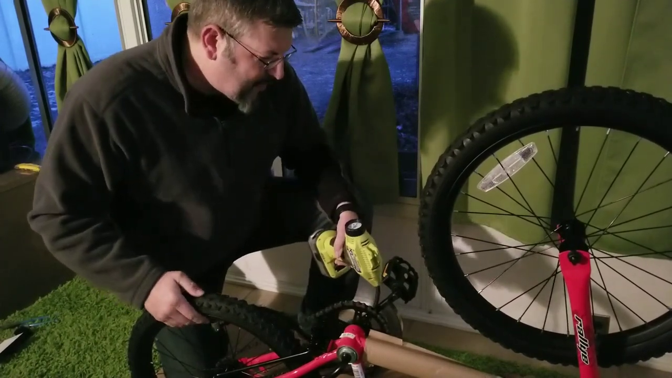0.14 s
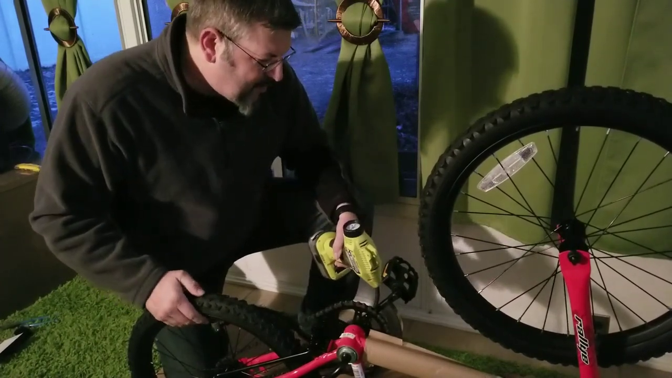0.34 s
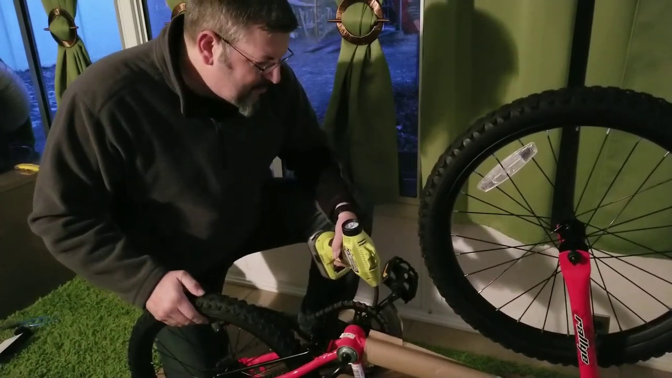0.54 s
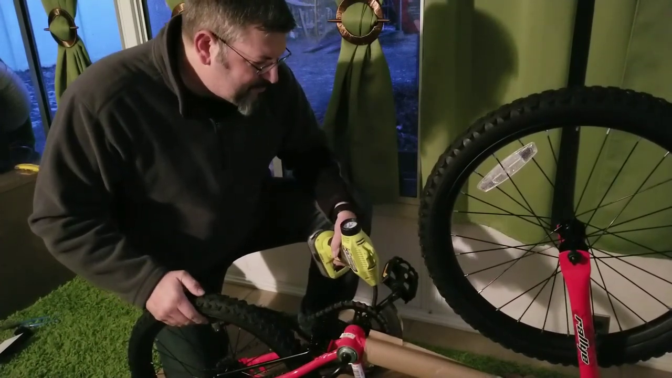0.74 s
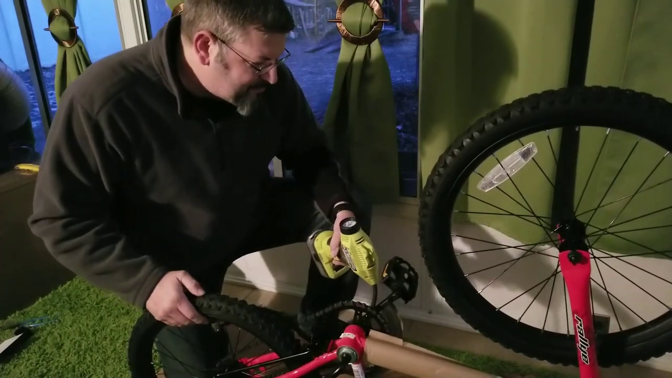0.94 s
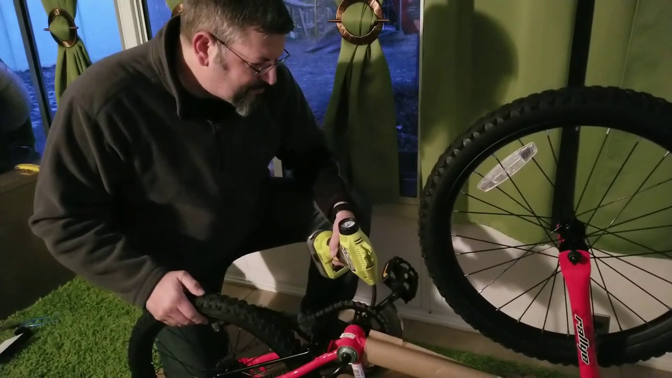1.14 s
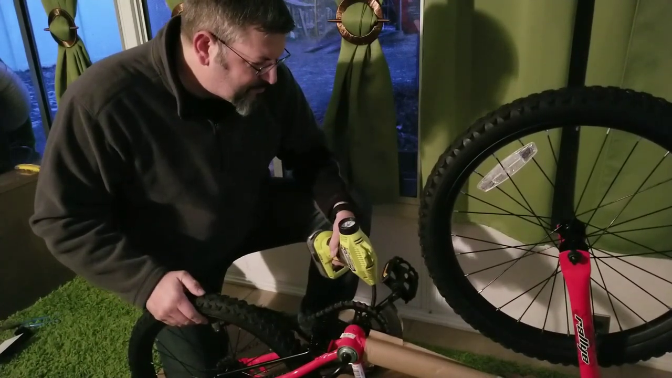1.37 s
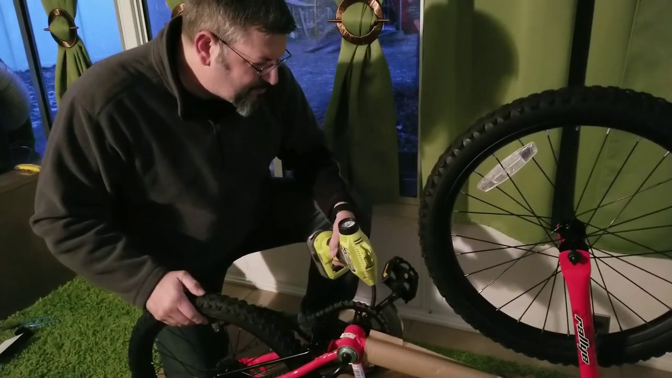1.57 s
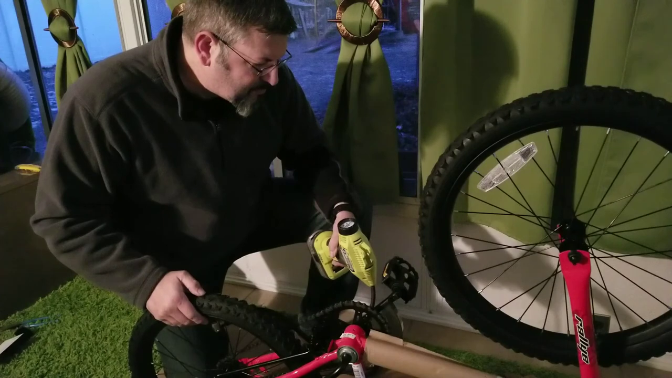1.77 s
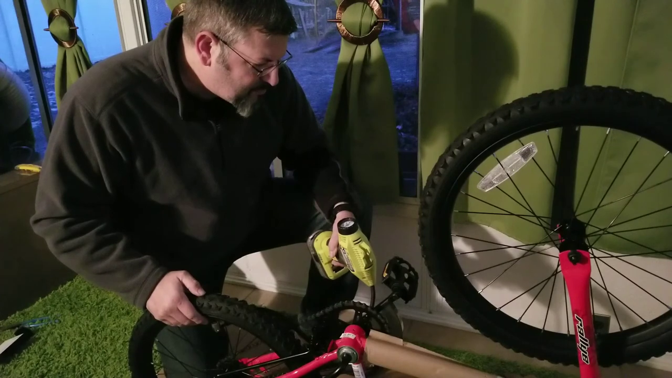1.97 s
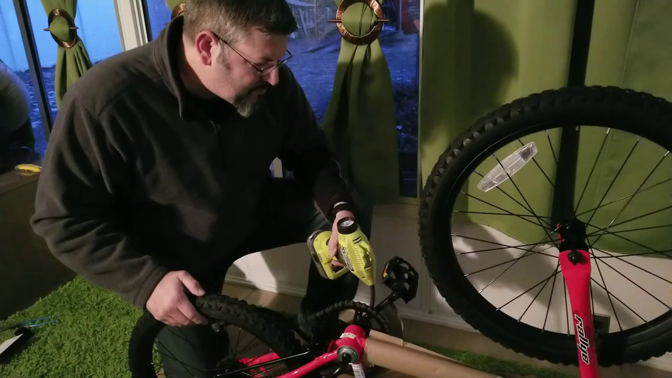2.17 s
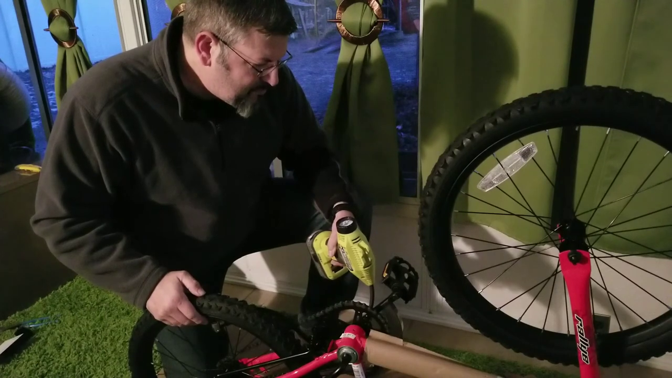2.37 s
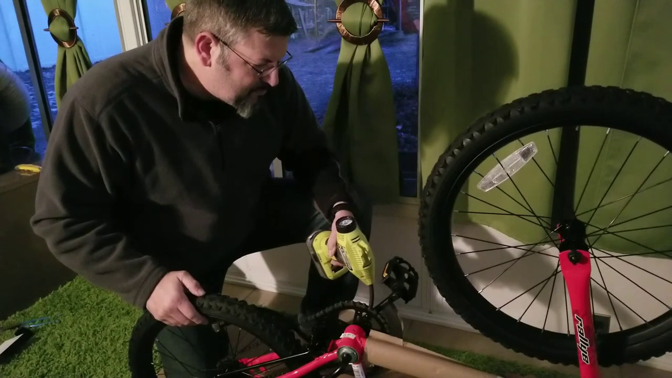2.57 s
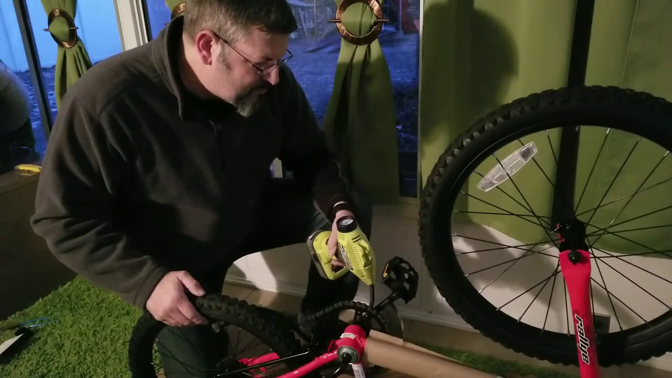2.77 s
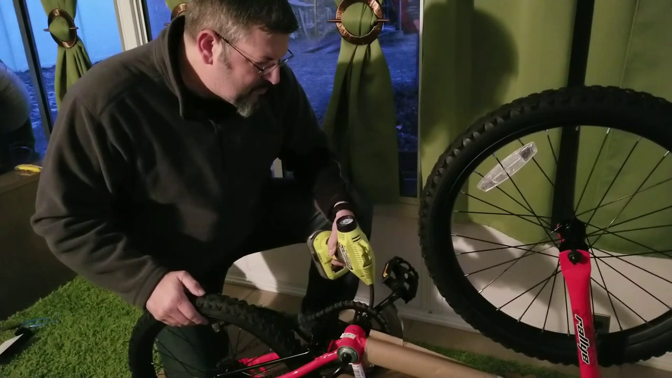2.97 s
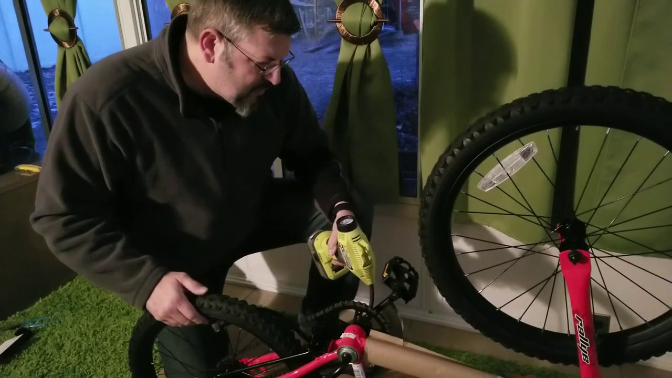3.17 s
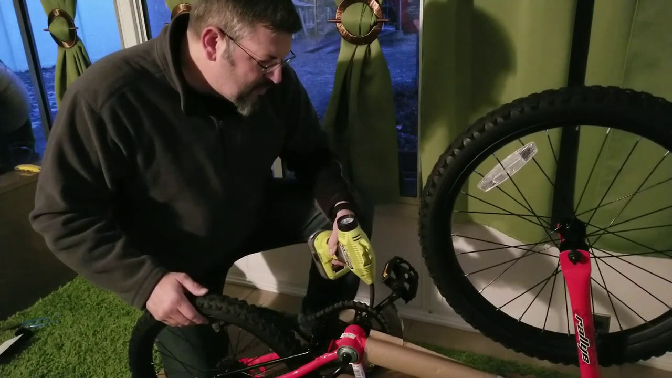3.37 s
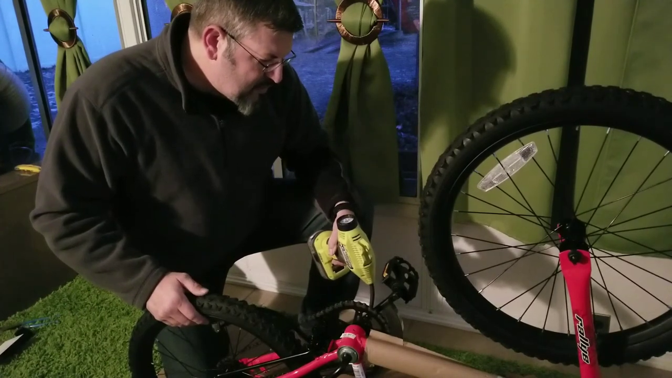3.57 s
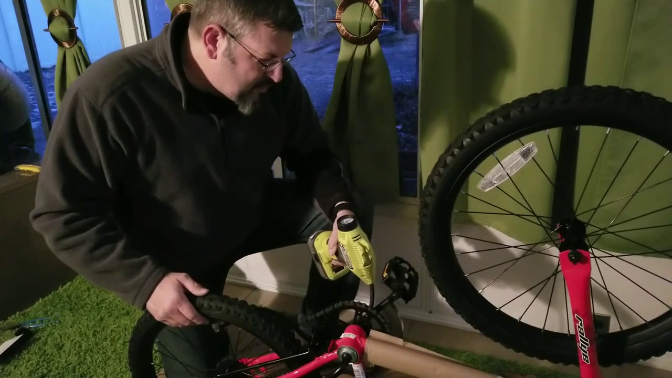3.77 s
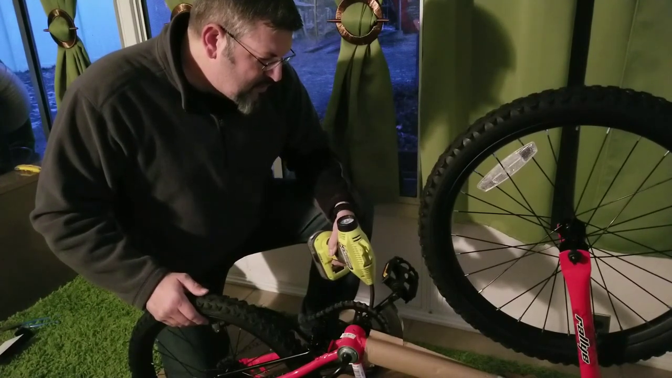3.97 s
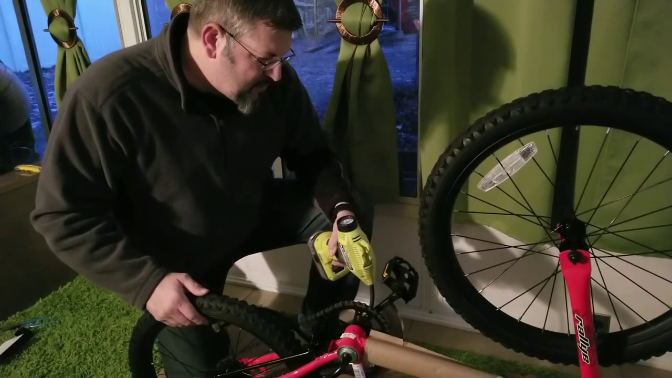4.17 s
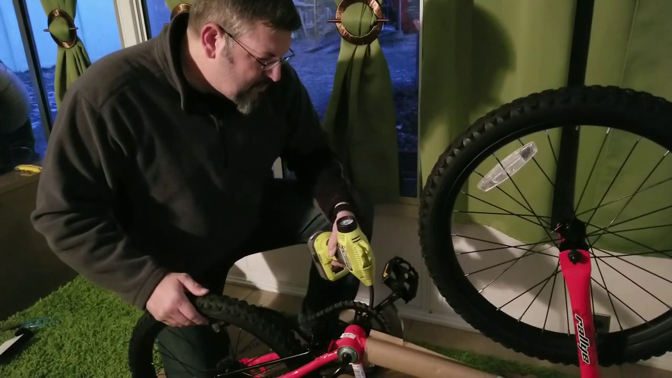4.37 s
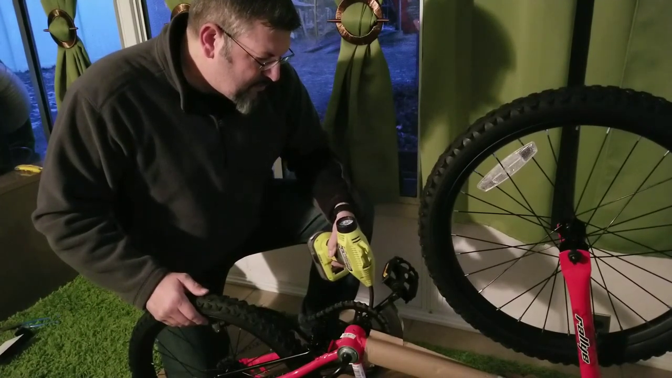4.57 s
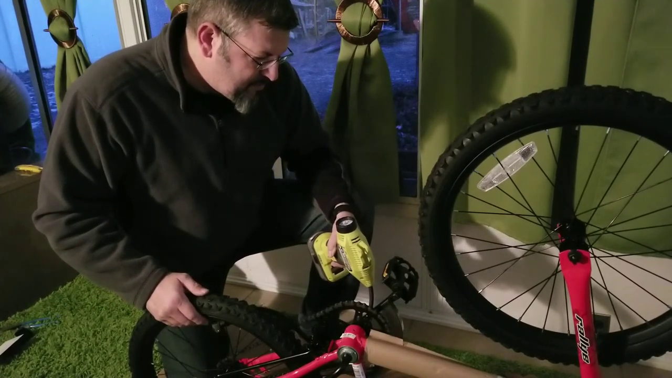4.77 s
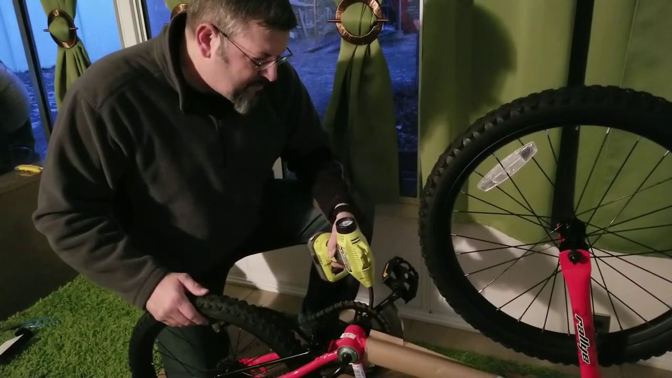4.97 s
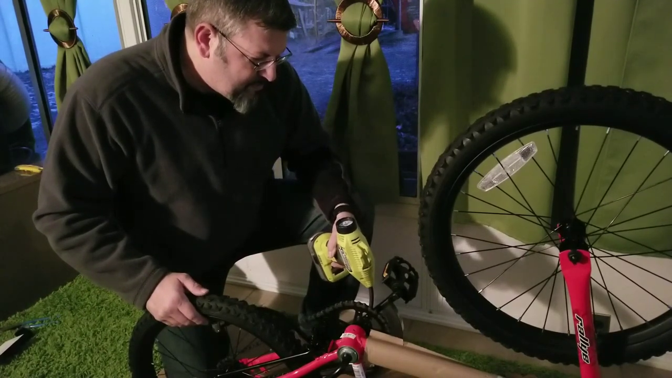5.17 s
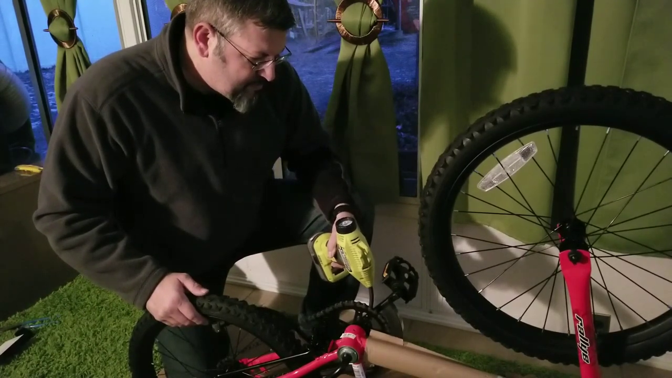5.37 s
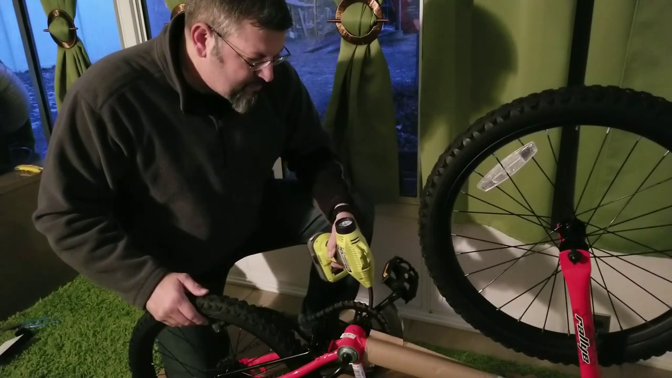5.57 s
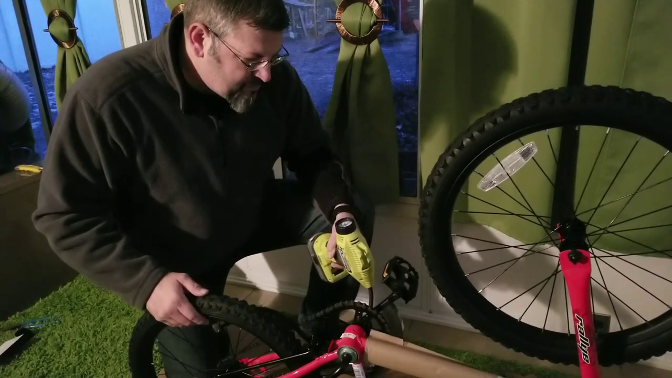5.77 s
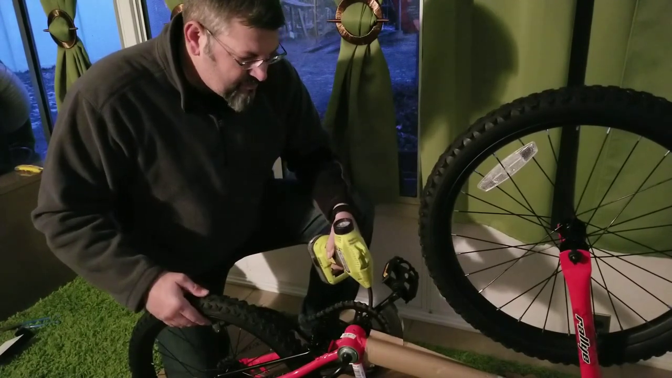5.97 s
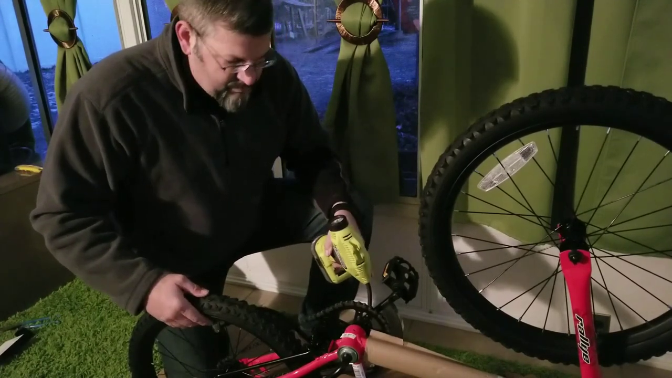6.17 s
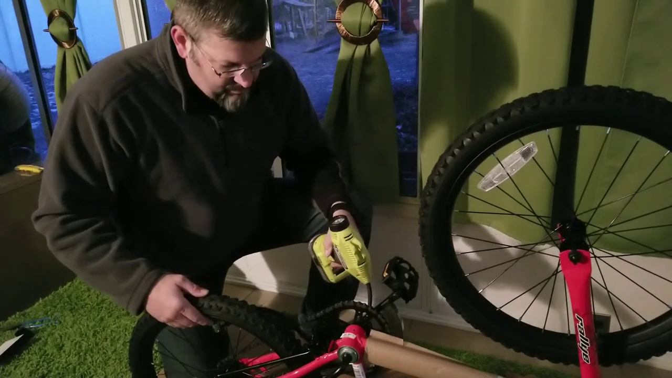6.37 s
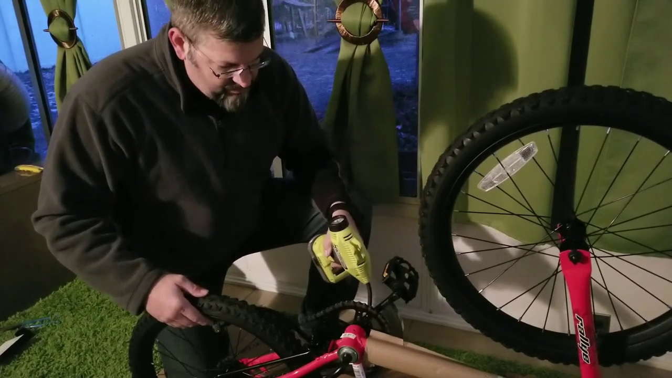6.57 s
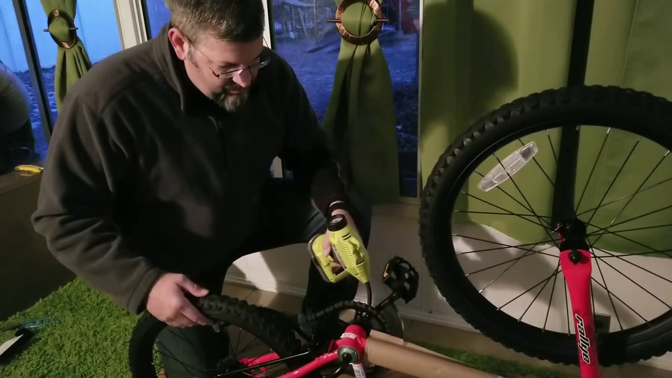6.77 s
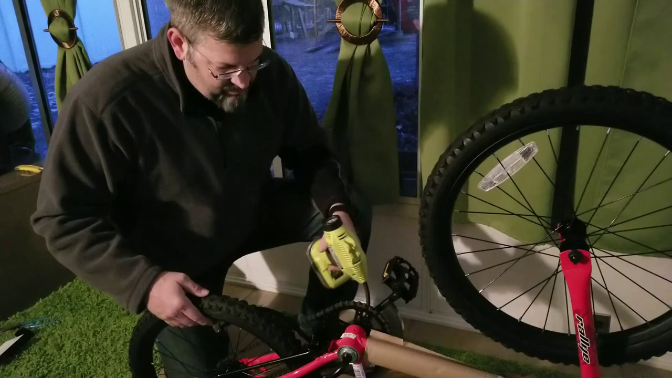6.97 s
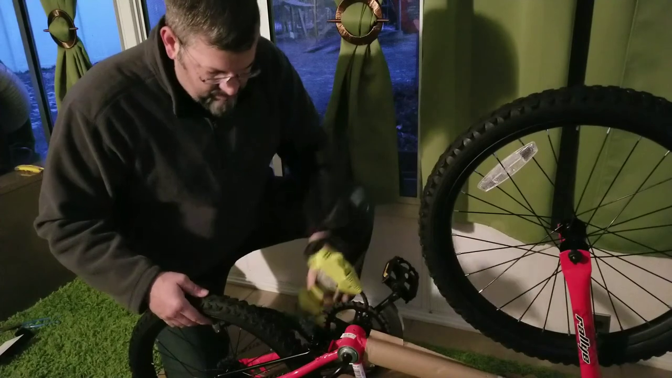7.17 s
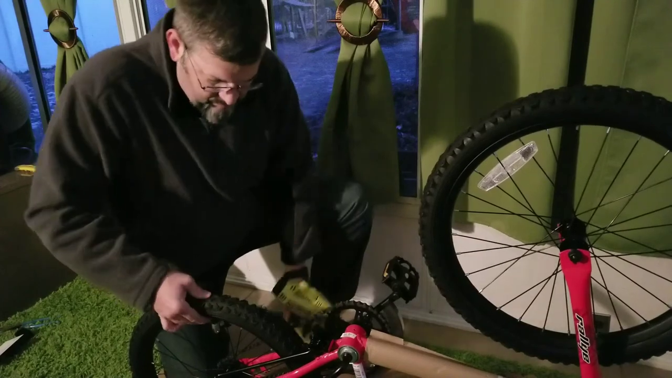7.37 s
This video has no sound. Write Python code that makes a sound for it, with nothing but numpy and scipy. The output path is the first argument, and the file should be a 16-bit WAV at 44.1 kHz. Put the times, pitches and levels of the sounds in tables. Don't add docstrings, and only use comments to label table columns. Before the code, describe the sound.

A small handheld air compressor buzzes and rattles hard while filling a bicycle tire indoors, then cuts off abruptly, leaving a quiet room.

```python
import sys
import numpy as np
from scipy import signal
from scipy.fft import rfft, irfft, next_fast_len
from scipy.io import wavfile
from scipy.ndimage import uniform_filter1d

SR = 44100
rng = np.random.default_rng(int(sys.argv[2]) if len(sys.argv) > 2 else 0)


def boost_factor(decibels):
    exponent = np.asarray(decibels, float) / 20
    return 10 ** exponent


def wav_out(sig):
    wavfile.write(sys.argv[1], SR, np.round(np.clip(np.atleast_2d(sig).T, -1, 1) * 32767).astype(np.int16))


N = 327341
PADDED = next_fast_len(N + 16384, True)
HZ = np.maximum(np.fft.rfftfreq(PADDED, 1 / SR), 1)
TIME = np.arange(N) / SR

# time_s, load_share (0-1)
TIRE_LOAD = [
    (0, 0.09),
    (1.5, 0.09),
    (2.5, 0.42),
    (3.5, 0.69),
    (6.2, 0.71),
]
# multiple_of_stroke_rate, level_db
SOFT_TONES = [(1, -58), (2, -46.5), (3, -8), (4, -9.5), (5, -9), (6, -12), (7, -12), (8, -4.5), (9, -2.5),
              (10, -21.5), (11, -5), (12, -1.5), (13, -4), (14, -14.5), (15, 6), (16, -9.5), (17, 0),
              (18, -25), (19, -20.5), (20, -8.5), (21, -15.5), (22, -10), (23, -6.5), (24, -5), (25, -3),
              (26, -28.5), (27, -15), (28, -27), (29, -29.5), (30, -18.5)]
# multiple_of_stroke_rate, level_db
HARD_TONES = [(1, -65), (2, -59), (3, -53.5), (4, -27.5), (5, -8), (6, -7), (7, -18), (8, -6.5), (9, -18.5),
              (10, -34.5), (11, -2.5), (12, -16.5), (13, -14), (14, -18), (15, -11), (16, -11.5),
              (17, -23.5), (18, -24.5), (19, -11), (20, -1), (21, 3.5), (22, -4.5), (23, -23), (24, -8.5),
              (25, -4), (26, -24), (27, -26), (28, -32.5), (29, -32.5), (30, -7)]
# multiple_of_stroke_rate, soft_db, hard_db
HIGH_TONES = [(41.0, -6, -2), (42.0, -9, -5), (44.0, -2, -7), (45.0, -10, -4), (46.0, -6, -7),
              (47.0, -5, -10), (53.0, -14, -6), (55.0, -6, -8), (56.0, -8, -5), (59.0, -12, -5),
              (61.0, -9, -1), (63.0, -4, -10), (64.0, -3, -2), (65.0, -5, -5), (66.0, -5, -11),
              (67.0, -1, -3), (68.0, -6, -5), (69.0, -5, -12), (76.6, -6, -11), (81.4, -13, -6),
              (82.0, -13, -4), (85.0, -15, -6), (92.0, -4, -9), (94.0, -9, -4), (99.0, -7, -6),
              (99.6, -11, -4)]
# pitch_hz, level_db (per Hz)
SOFT_COLOUR = [(88, -63.5), (150, -10), (302, -5.5), (445, -14.5), (490, -7), (618, -9), (860, -5),
               (912, 1), (1130, -9.5), (1240, -2), (2140, -7), (4140, -4), (7710, -13.5), (14100, -10),
               (15500, -17)]
# pitch_hz, level_db (per Hz)
HARD_COLOUR = [(88, -88.5), (150, -59.5), (221, -27), (296, -12), (445, -5.5), (490, -11), (583, -11),
               (656, -10), (1020, -8.5), (1240, -2.5), (1910, -9), (3830, -3), (9360, -14.5), (14100, -9.5),
               (15500, -16)]
# pitch_hz, width_hz, level_db
SOFT_SHELL = [(2720, 26, 3.5), (3300, 86, -10.5), (4110, 38, -14), (4410, 70, -11), (4750, 28, -3.5),
              (5650, 47, -12.5), (5770, 43, -9.5), (6600, 160, 2), (7120, 260, -1), (8370, 29, 8),
              (8780, 320, -0.5), (8500, 22, 4.5), (11300, 57, 0), (11350, 40, -7)]
# pitch_hz, width_hz, level_db
HARD_SHELL = [(2497, 49, 12), (2526, 76, -17), (3520, 29, 13), (3860, 38, -6), (3850, 45, -16),
              (4200, 100, -22), (4630, 120, 6), (4940, 42, 8.5), (5000, 23, -12), (5300, 22, -3),
              (6140, 52, 10.5), (7080, 60, 13.5), (8900, 64, -4), (11060, 47, 8)]
CONTACTS = [
    (0.059, 29, 2.05),
    (0.89, 7.4, 0.23),
    (0.18, 1.6, 0.19),
]
# time_s, level_db
EFFORT = [
    (0.0, -22.5),
    (0.07, -24),
    (1.09, -22),
    (3.41, -22),
    (4.93, -23.5),
    (6.13, -22.5),
    (6.15, -22),
]
# time_s, level_db
RUNDOWN = [
    (6.21, -22),
    (6.294, -29.5),
    (6.336, -39.5),
    (6.362, -34),
    (6.398, -58),
    (6.422, -55.5),
    (6.44, -69),
    (6.5, -84.5),
    (6.56, -110),
]
# start_s, end_s, pitch_hz, width_hz, level_db
PANELS = [(-.4, .8, 4220, 160, -14), (.9, 2.6, 4120, 120, -15), (-.4, 1.6, 5700, 90, -14),
          (1.7, 4.3, 6070, 50, -13), (2.8, 4.5, 3715, 40, -16), (4.4, 5.4, 4945, 30, -14),
          (4.5, 6.2, 3855, 50, -17), (1.2, 3.0, 3865, 60, -15), (1.2, 2.7, 4710, 50, -16),
          (4.4, 6.2, 5675, 40, -18)]
# start_s, peak_db, pitch_hz, t60_s
LAST_KNOCKS = [
    (6.1844, -10, 4950, 0.03),
    (6.1974, -6.5, 4540, 0.037),
    (6.2472, -5, 4550, 0.035),
    (6.2574, -9.5, 4690, 0.016),
    (6.299, -13, 3110, 0.03),
    (6.3555, -24.5, 1178, 0.055),
    (6.4138, -33, 2490, 0.03),
]
# pitch_hz, likeness (0-1)
LIKENESS = [(60, 0.58), (150, 0.25), (380, 1), (950, 0.4), (2380, 0.45), (5980, 0.18), (15000, 0.2)]
# pitch_hz, left_lead_radians
EAR_PHASE = [(300, 1), (1600, 1.19), (5500, 0.39), (8000, 4), (10000, 1), (15000, -0.8)]
# pitch_hz, level_db (per Hz)
HUM_COLOUR = [(18, -35), (30, -19.5), (70, -17.5), (130, -8), (149, -12.5), (183, -23.5), (200, -23),
              (338, -4.5), (389, -13.5), (440, -7), (563, -24), (721, -23.5), (1200, -35), (1560, -66),
              (2640, -120)]
# pitch_hz, level_db (per Hz)
HISS_COLOUR = [(530, -42), (900, -8), (1880, -10.5), (2540, -7.5), (2760, -8.5), (3940, -12.5), (4330, -9),
               (4660, -3.5), (4820, -4.5), (7230, -5.5), (8250, -19.5), (13900, -11), (15500, -30)]
# pitch_hz, left_minus_right_db
HISS_SIDES = [(60, 0.0), (130, 0.5), (290, -4.0), (640, -3), (1410, 1), (3100, -11.5), (6820, -21),
              (15000, 3.5)]
# middle_s, length_s, rise_db
HUM_SWELLS = [
    (6.63, .24, 7.5),
    (6.869, .1, 7.5),
    (6.975, .11, 11.5),
    (7.157, .15, 11.5),
    (7.391, .08, 5),
]
# low_hz, high_hz, kept_share (at first), full_s (time until all is kept)
DROPPED = [
    (275, 335, .55, 3.4),
    (335, 395, .45, 1.6),
    (395, 460, .1, 4.2),
]
# low_hz, high_hz
LOWEST = [(145, 215), (215, 275)]
# start_s, length_s, depth (1-3)
LOW_MOMENTS = [(0, 1.22, 1), (0, .18, 2), (.12, .06, 3), (.29, .12, 2), (.29, .06, 3), (.53, .05, 3),
               (.68, .05, 2), (.8, .11, 2), (.83, .05, 3), (1.4, .23, 1), (1.93, .18, 1), (2.22, .05, 2),
               (2.28, .11, 1), (2.5, .15, 1), (2.8, .04, 1), (2.96, .05, 1), (3.18, .05, 1), (6.26, .06, 1)]
NEEDED = [(2, 3), (1, 3)]

ROOM_T60_S = 0.12
VALVE_HZ, VALVE_T60_S = 1222, 0.053
START_RATE, SAG_RATE, SAG_S = 62.25, 3.75, 7.2
CUT_S, BRAKE, CRAWL = 6.175, 225, 21
BODY_DB, BODY_LOAD_DB, BODY_SMOOTH_S, BODY_FOLLOWS = -7.5, 2.5, 0.05, 0.75
AIR_DB, AIR_LOAD_DB, AIR_COAST_DB = -1.5, 1, -2
HUM_DB, HISS_DB = -73, -70
WHINE_HZ, WHINE_DB = 4505, -88
STIR_S, STIR_DB_PER_S = 7.22, 20.5
MIRRORED = np.array([[1], [-1]])


def rms_one(x):
    return x / np.sqrt(np.mean(x ** 2) + 1e-20)


def in_time(rows):
    s, *columns = np.transpose(rows)
    return [np.interp(TIME, s, c) for c in columns]


def at_hz(points):
    hz, value = np.transpose(points)
    return np.interp(np.log(HZ), np.log(hz), value)


def shaped(x, gain):
    return irfft(rfft(x, PADDED) * gain, PADDED)[..., :N]


def band(low_hz, high_hz):
    return 1 / np.sqrt((1 + (low_hz / HZ) ** 12) * (1 + (HZ / high_hz) ** 12))


def drift(rate, count):
    knots = rng.standard_normal((count, 400))
    return np.array([np.interp(TIME * rate, np.arange(400), k) for k in knots]) * np.sqrt(1.5)


def compressor():
    speed = START_RATE - SAG_RATE * (1 - np.exp(-TIME / SAG_S))
    speed = np.maximum(speed - BRAKE * np.maximum(TIME - CUT_S, 0), CRAWL)
    turns = np.cumsum(speed) / SR - 0.47
    load, = in_time(TIRE_LOAD)
    level_db, = in_time(list(EFFORT) + list(RUNDOWN))
    driven = np.interp(TIME - CUT_S, [-0.015, 0.065], [1, 0.1])

    start_db = EFFORT[0][1]
    smoothed_db = uniform_filter1d(level_db, size=int(BODY_SMOOTH_S * SR))
    body_db = start_db + BODY_FOLLOWS * (smoothed_db - start_db) + BODY_DB + BODY_LOAD_DB * load
    air_db = level_db + AIR_DB + AIR_LOAD_DB * load + AIR_COAST_DB * (1 - driven)

    noisy = rattle_and_air(turns, load)
    low_tones = [(k, soft_db, hard_db) for (k, soft_db), (_, hard_db) in zip(SOFT_TONES, HARD_TONES)]
    tones = partials(low_tones, turns, load, scatter=1.0, unsteady_db=1.4, side_db=-2.0)
    body = boost_factor(-3.5) * driven * tones
    body += boost_factor(-5.5 + 3.0 * (1 - driven)) * rms_one(shaped(noisy, band(130, 1600)))
    body += boost_factor(-11) * driven * valve(turns, load)

    ringing = partials(HIGH_TONES, turns, load, scatter=1.96, unsteady_db=2.5, side_db=-9.0)
    clatter = rms_one(shaped(noisy, band(1750, 7530)))
    rattle = boost_factor(-8.5) * driven * ringing + clatter + panels(clatter)
    air = rms_one(shaped(noisy, band(6870, 17000)))
    return boost_factor(body_db) * body + boost_factor(level_db - 0.02) * rattle + boost_factor(air_db) * air + last_knocks()


def partials(orders, turns, load, scatter, unsteady_db, side_db):
    out = np.zeros((2, N))
    for (k, soft_db, hard_db), slow in zip(orders, drift(4.0, count=len(orders))):
        angle = 2 * np.pi * k * turns + scatter * rng.standard_normal() + 0.091 * unsteady_db * slow
        side = boost_factor(side_db - 50 / k) * np.cos(angle + 2 * np.pi * rng.random())
        gain = boost_factor(soft_db + (hard_db - soft_db) * load * (k > 4) + unsteady_db * slow)
        out += gain * (np.cos(angle) + side * MIRRORED)
    return rms_one(out)


def valve(turns, load):
    at = np.flatnonzero(np.diff(np.floor(turns)) > 0)
    snaps = np.zeros(N)
    snaps[at] = (0.53 + load[at]) * boost_factor(3.0 * rng.standard_normal(len(at)))
    decay = boost_factor(-60 / (VALVE_T60_S * SR))
    step = 2 * np.pi * VALVE_HZ / SR
    ring = signal.lfilter([0, np.sin(step)], [1, -2 * decay * np.cos(step), decay ** 2], snaps + 1e-18)
    return rms_one(ring)


def looped(turns, strokes, change_rate):
    patterns = rng.standard_normal((3, 4, 700 * strokes))
    at = (turns / strokes % 1 * 700 * strokes).astype(int)
    return (patterns[:, :, at] * (1 + 0.5 * drift(change_rate, count=4))).sum(axis=1) / 2


def shell(colour, peaks, lift_db):
    bumps = sum(boost_factor(db + lift_db) / (1 + ((HZ - hz) / width) ** 2) for hz, width, db in peaks)
    return boost_factor(at_hz(colour)) * (1 + bumps)


def stereo(shared, scattered):
    alike = np.clip(at_hz(LIKENESS) + 0.092, 0, 1)
    age = np.arange(8000) / SR
    echoes = rng.standard_normal((2, 8000)) * boost_factor(-60 * age / ROOM_T60_S) * (age > 0.003)
    echoes = rfft(echoes / np.sqrt(np.sum(echoes[0] ** 2)), PADDED)
    lead = np.exp(0.5j * at_hz(EAR_PHASE) * MIRRORED)
    still = 0.6 / (1 + (HZ / 14000) ** 2)
    fixed_paths = shaped(shared, np.sqrt(alike) * lead + np.sqrt((1 - alike) * still) * echoes)
    return fixed_paths + shaped(scattered, np.sqrt((1 - alike) * (1 - still)))


def rattle_and_air(turns, load):
    contact = sum(strength * np.exp(sharp * (np.cos(2 * np.pi * (turns - at)) - 1))
                  for at, sharp, strength in CONTACTS)
    swell = 1.42 + np.interp(TIME - CUT_S, [0, 0.04], [1, 0.4]) * contact
    swell = swell * boost_factor(0.46 * np.cos(2 * np.pi * turns / 5) + 0.46 * drift(60.0, count=1)[0])
    grit = rng.standard_normal((3, N)) * boost_factor(2.0 * np.clip(rng.standard_normal(N), -3, 3))

    fades = 1 / np.sqrt(1 + (HZ / 6500) ** 6)
    thin = 1 / np.sqrt(1 + (2300 / HZ) ** 8)
    repeating = boost_factor(-6.5) * shaped(looped(turns, strokes=1, change_rate=0.97), fades * thin)
    repeating += boost_factor(-3.0) * shaped(looped(turns, strokes=5, change_rate=2.304), fades)
    paths = swell * (grit + repeating)

    source = stereo(paths[0], paths[1:])
    soft = rms_one(shaped(source, shell(SOFT_COLOUR, SOFT_SHELL, lift_db=-0.5)))
    hard = rms_one(shaped(source, shell(HARD_COLOUR, HARD_SHELL, lift_db=-11.5)))
    hollow = 1 - 0.2 * np.exp(-((HZ - 1900) / 400) ** 2) - 0.22 * np.exp(-((HZ - 9400) / 350) ** 2)
    return shaped(soft + (hard - soft) * load, hollow)


def panels(rattle):
    out = 0
    for (start, end, hz, width, db), flutter in zip(PANELS, drift(12.0, count=len(PANELS))):
        sos = signal.butter(1, [hz - width / 2, hz + width / 2], "band", fs=SR, output="sos")
        free = np.interp(TIME, [start - 0.3, start + 0.19, end - 0.2, end + 0.3], [0, 1, 1, 0])
        out = out + boost_factor(db + 1.2 * flutter) * free * rms_one(signal.sosfilt(sos, rattle))
    return out


def quiet_room():
    white = rng.standard_normal((2, 2, N))
    low = rms_one(shaped(white[0] * 0.45 + white[0, 0], boost_factor(at_hz(HUM_COLOUR)) * (HZ < 1200)))
    lean_db = np.array([[-3.2], [3.2]])
    swell_db = sum(db * np.cos(np.pi * np.clip((TIME - s) / length, -0.5, 0.5))
                   for s, length, db in HUM_SWELLS)
    hum = boost_factor(HUM_DB + swell_db + lean_db) * shaped(low, band(230, 520))
    rumble = boost_factor(-73 + np.array([[2.5], [-2.4]])) * shaped(low, 1 - band(310, 470))
    sides = boost_factor(at_hz(HISS_SIDES) / 2 * MIRRORED)
    hiss = rms_one(shaped(white[1], boost_factor(at_hz(HISS_COLOUR)) * (HZ > 900) * sides))
    whine = boost_factor(WHINE_DB + 2 * lean_db) * np.sin(2 * np.pi * WHINE_HZ * TIME)
    stir = boost_factor(STIR_DB_PER_S * np.maximum(TIME - STIR_S, 0))
    return whine + hum + stir * (rumble + boost_factor(HISS_DB + 2.5) * hiss)


def last_knocks():
    out = np.zeros((2, N))
    age = np.arange(4000) / SR
    for s, db, hz, t60 in LAST_KNOCKS:
        burst = rng.standard_normal((2, 4000)) * boost_factor(-60 * age / t60) * np.minimum(age / 0.0017, 1)
        sos = signal.butter(2, [hz * 0.93, hz * 1.07], "band", fs=SR, output="sos")
        start = round(s * SR)
        out[:, start:start + 4000] += boost_factor(db + 4.5) * signal.sosfilt(sos, burst + burst[0])
    return out


def scene():
    return compressor() + quiet_room()


def band_limit(x):
    return signal.sosfilt(signal.butter(12, 15740, fs=SR, output="sos"), x)


def record(dry):
    frame = (TIME / 0.035).astype(int)
    loud = TIME < 6.36
    dry = 0.65 * np.tanh(dry / 0.65)
    out = dry - loud * shaped(dry, 1.0 * (HZ < 145))

    lost = []
    for _, _, kept, full_s in DROPPED:
        chance = rng.random((2, frame[-1] + 1))[:, frame]
        lost.append(chance >= kept + (1 - kept) * TIME / full_s)
    depth = np.max([deep * (TIME > s) * (TIME < s + length) for s, length, deep in LOW_MOMENTS], axis=0)
    lost += [depth < np.array(ears)[:, None] for ears in NEEDED]
    for (low_hz, high_hz, *_), gone in zip(list(DROPPED) + list(LOWEST), lost):
        gate = uniform_filter1d(1.0 * (gone & loud), size=900)
        out -= gate * shaped(dry, 1.0 * (HZ >= low_hz) * (HZ < high_hz))

    low_noise = rms_one(shaped(rng.standard_normal((2, N)), band(20, 250) * HZ ** 0.6))
    out += boost_factor(-80.5) * loud * low_noise
    out = shaped(out, boost_factor(np.interp(HZ, [14560, 14700, 15700], [0, -30, -45])))
    return band_limit(out)


dry = scene()
out = record(dry)
wav_out(out)
```